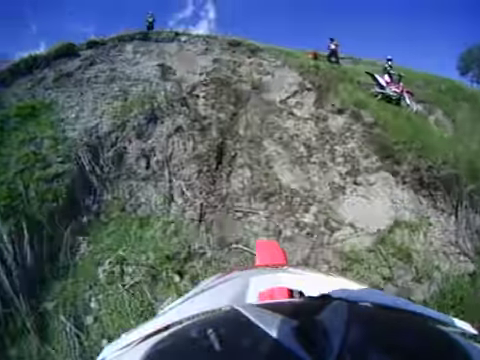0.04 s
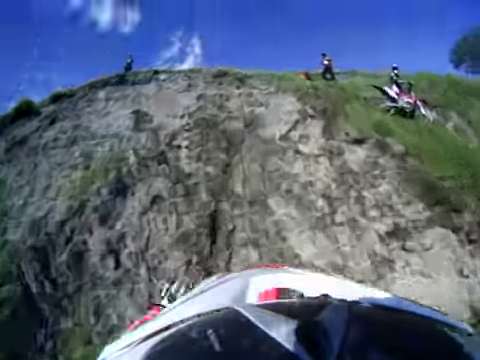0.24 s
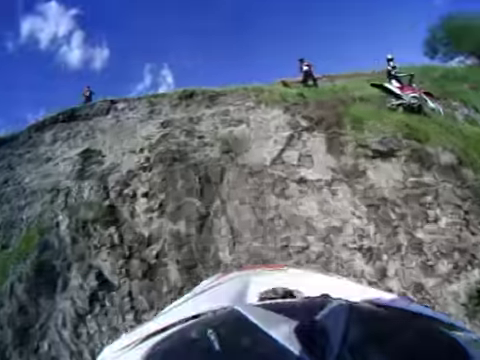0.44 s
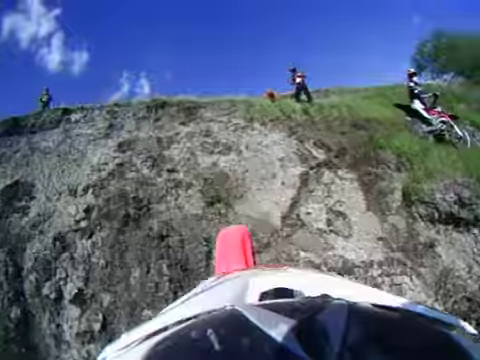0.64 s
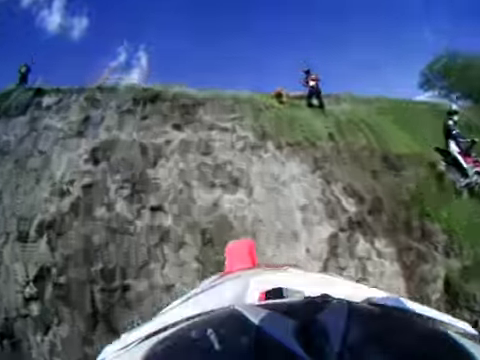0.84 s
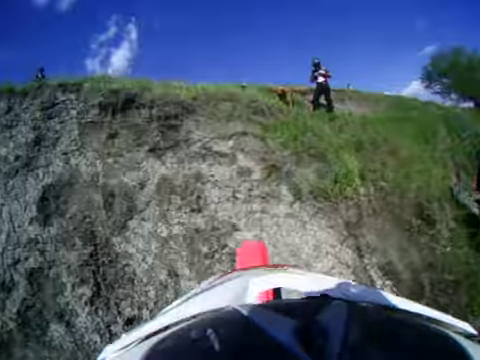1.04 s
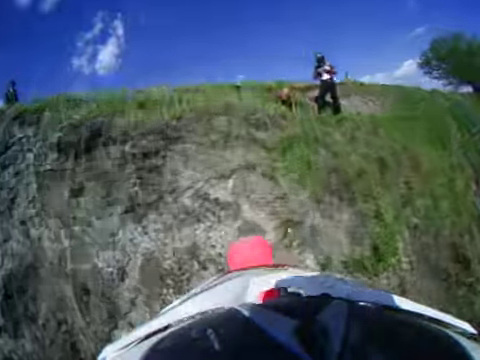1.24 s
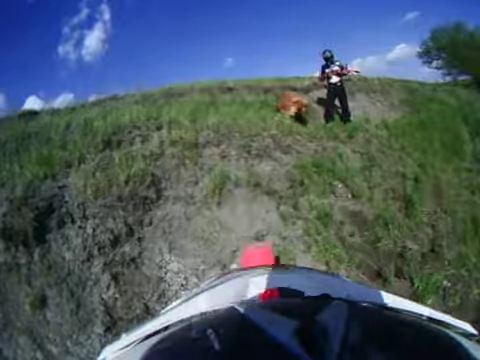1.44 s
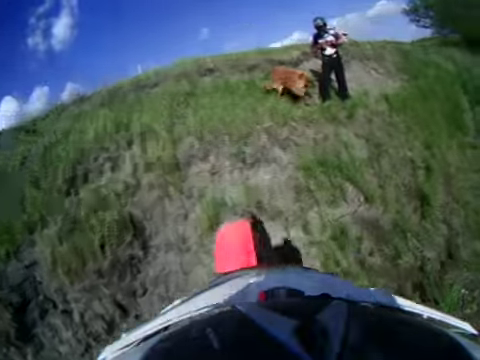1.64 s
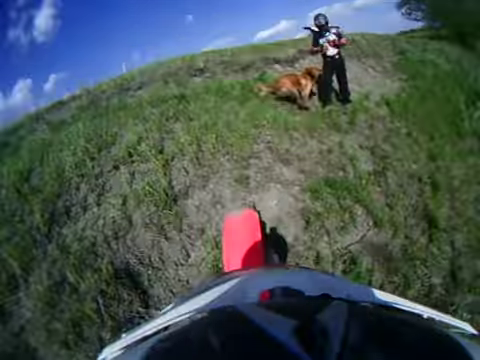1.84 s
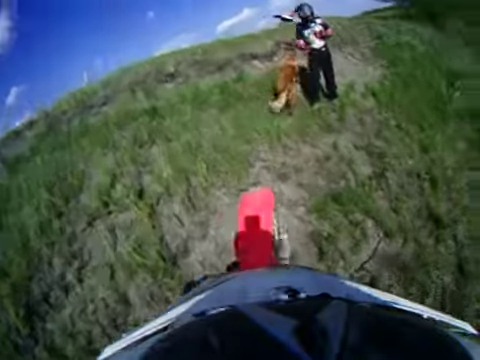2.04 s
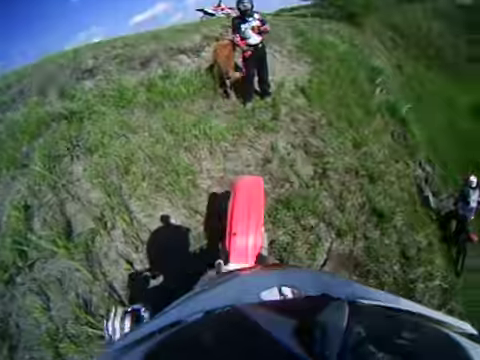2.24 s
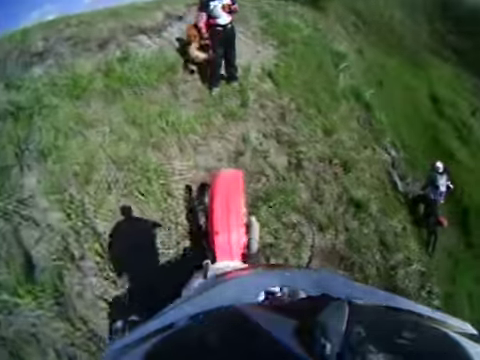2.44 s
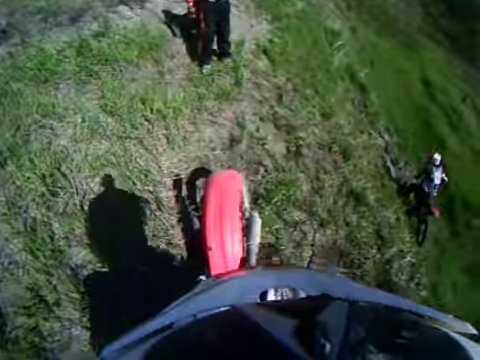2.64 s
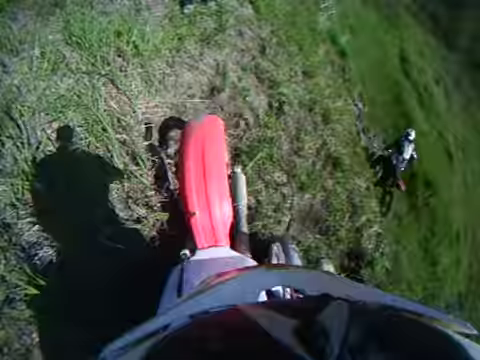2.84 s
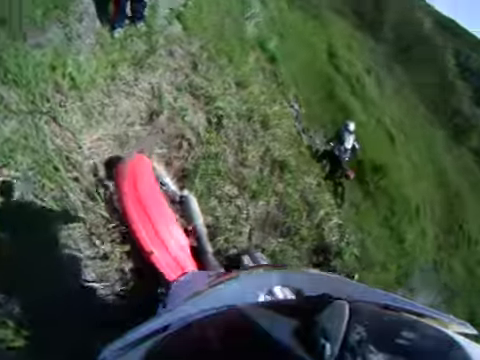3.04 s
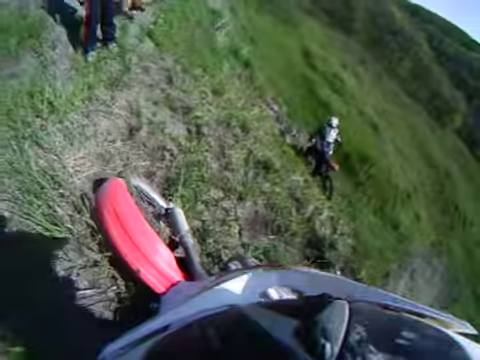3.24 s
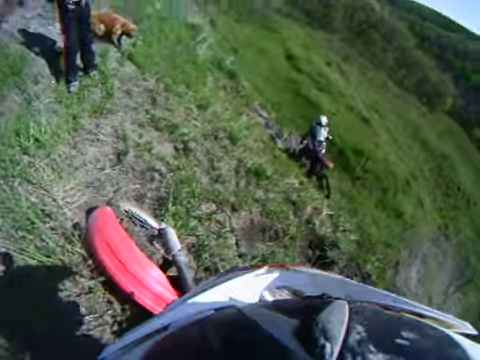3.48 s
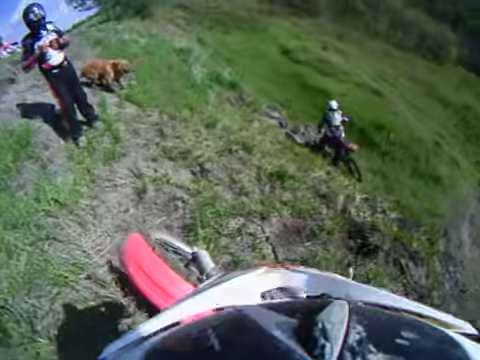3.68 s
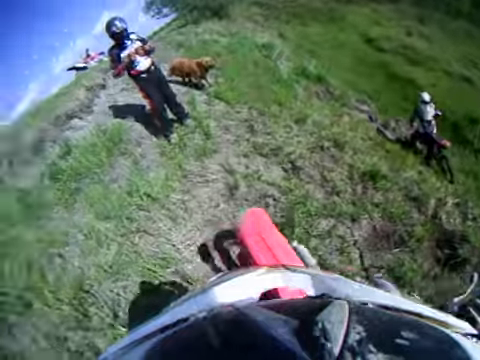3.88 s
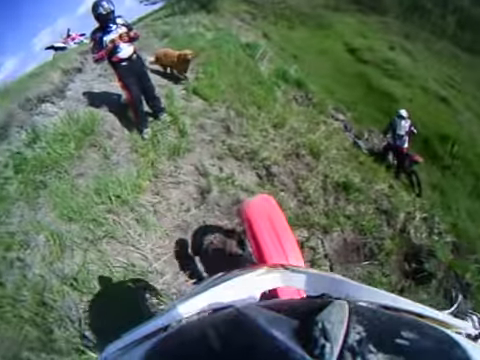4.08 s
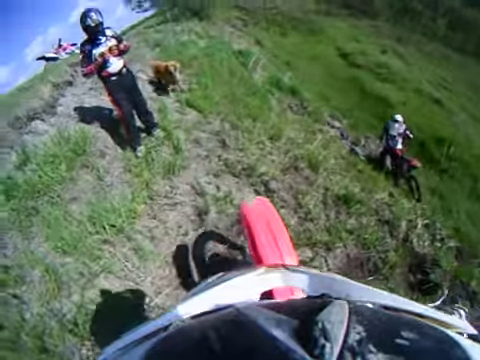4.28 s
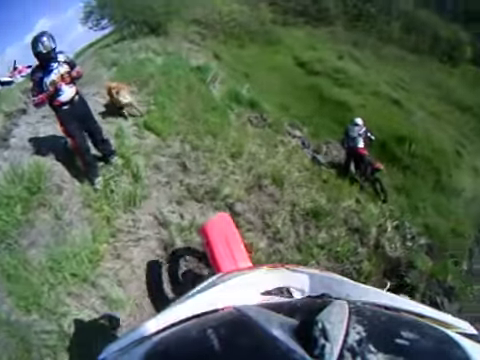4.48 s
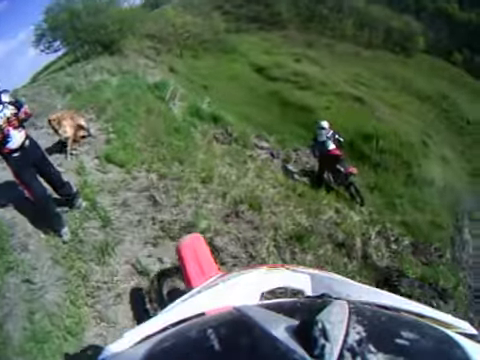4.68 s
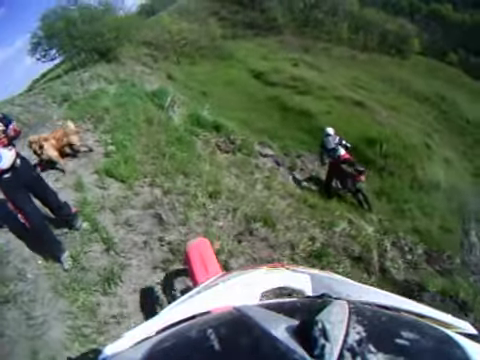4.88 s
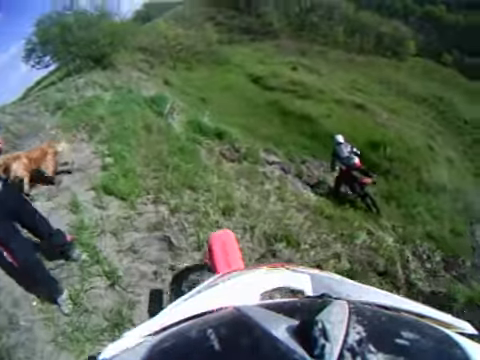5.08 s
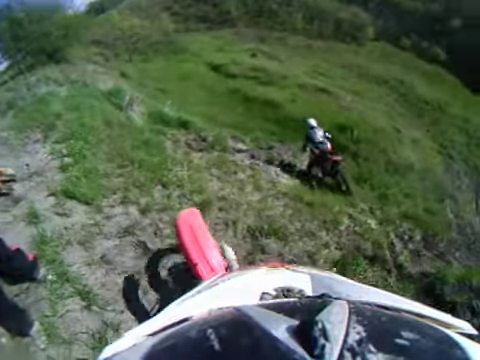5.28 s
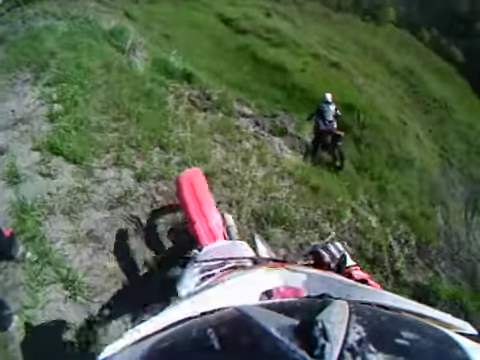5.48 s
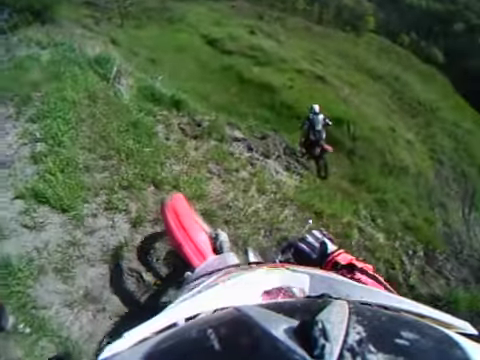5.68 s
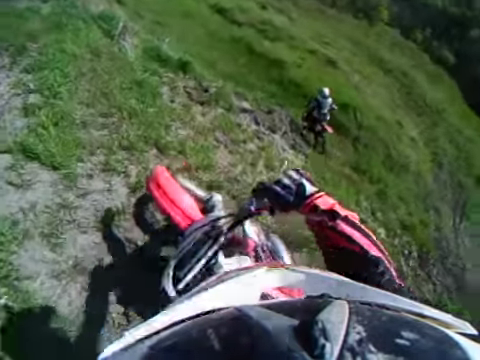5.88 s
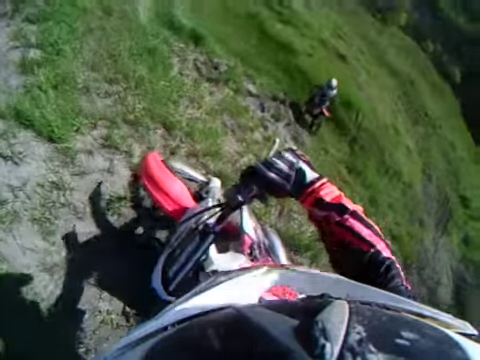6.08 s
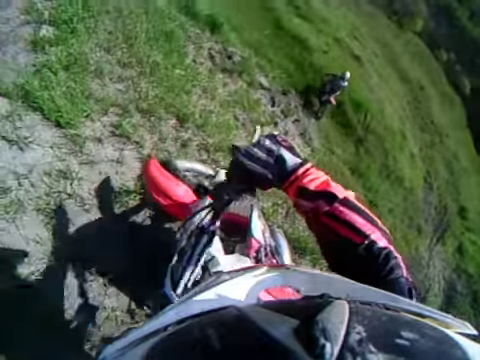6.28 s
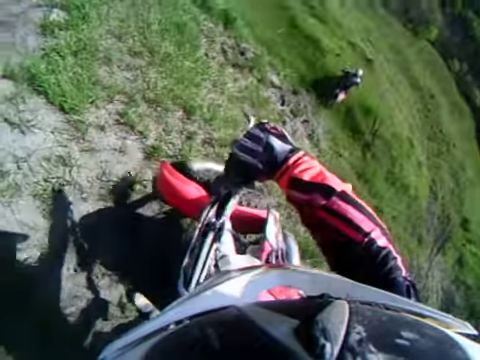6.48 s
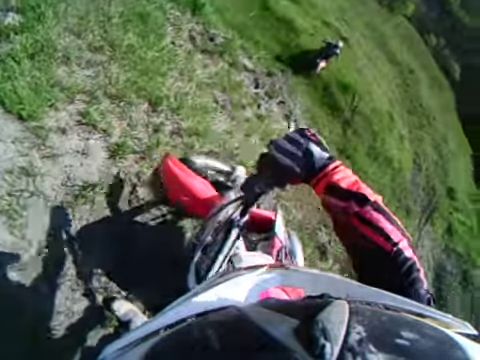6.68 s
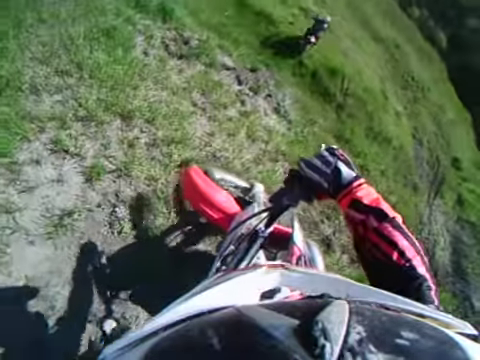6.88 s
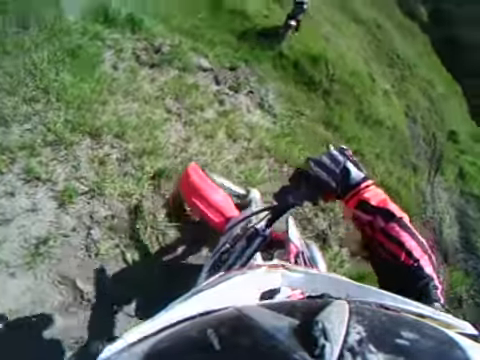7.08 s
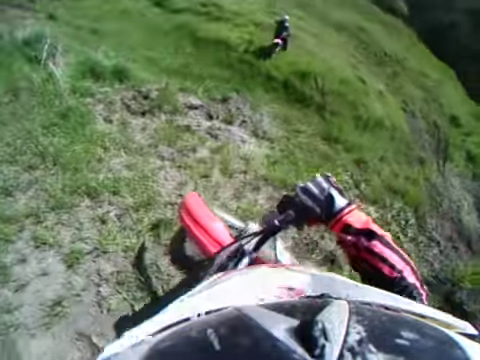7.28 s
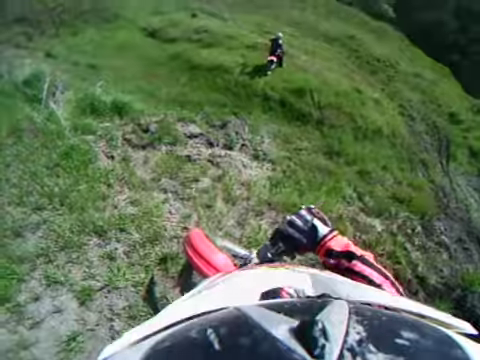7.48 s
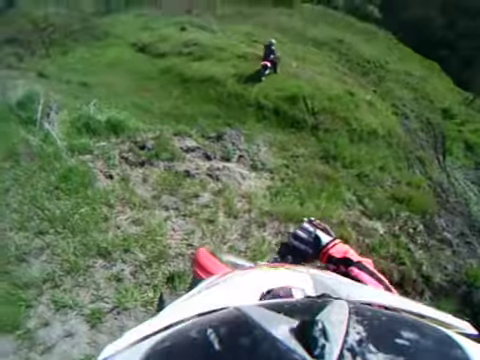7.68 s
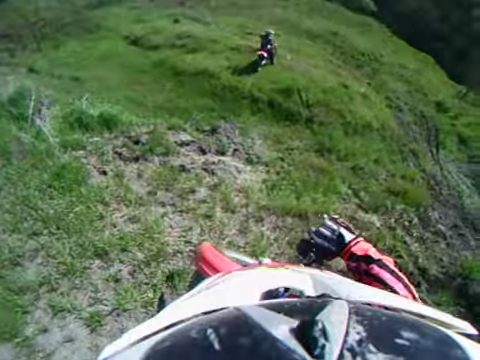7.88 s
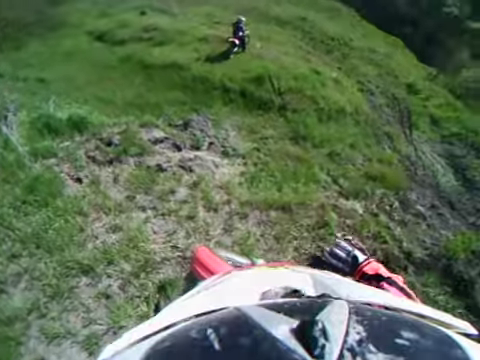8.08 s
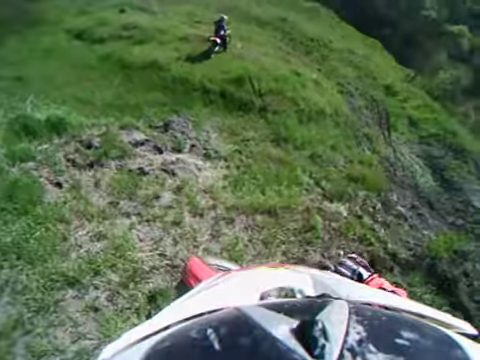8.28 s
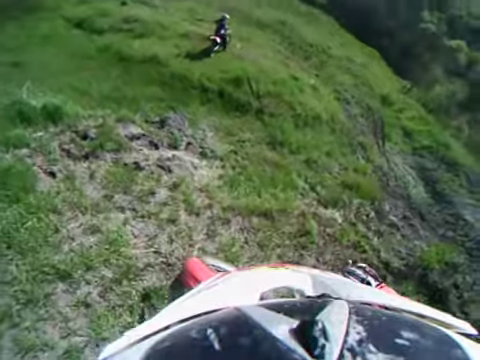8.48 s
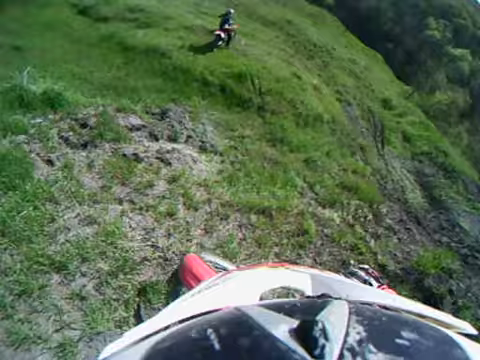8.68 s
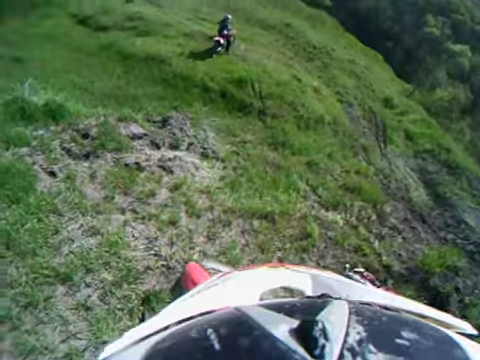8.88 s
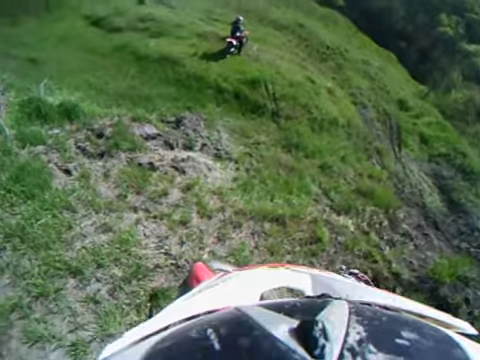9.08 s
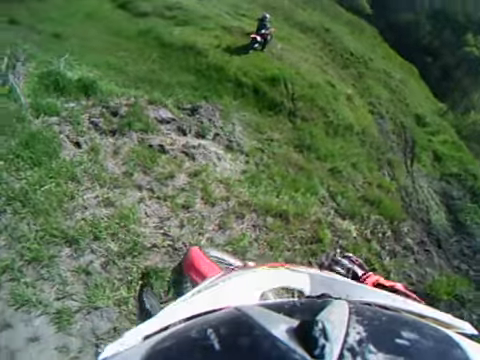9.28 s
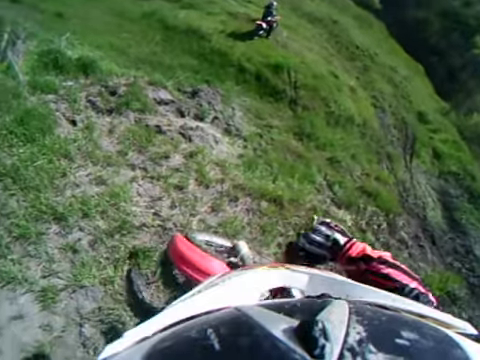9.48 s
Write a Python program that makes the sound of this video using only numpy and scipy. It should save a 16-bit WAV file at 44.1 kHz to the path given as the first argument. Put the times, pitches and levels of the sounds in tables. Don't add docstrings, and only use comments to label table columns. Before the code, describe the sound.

Raspy dirt bike engine very close to a cheap, overloaded helmet microphone on an open hillside. Rapid loud revs rise and fall, sharp knocks break out as the gas is cut, and another roar follows. Then come weaker blips, stuttering pops and a falling pitch, ending in a quiet lumpy idle, with scattered dull putts over a low throb and slight wind rumble.

```python
import sys
import numpy as np
from scipy import signal
from scipy.io import wavfile
from scipy.ndimage import uniform_filter1d

SR = 44100
rng = np.random.default_rng(int(sys.argv[2]) if len(sys.argv) > 2 else 0)


def to_wav(s):
    ch = np.atleast_2d(s).T
    pcm = np.round(np.clip(ch, -1, 1) * 32767)
    wavfile.write(sys.argv[1], SR, pcm.astype(np.int16))


def how_loud(loudness_db):
    steps = np.asarray(loudness_db, float) / 20
    return 10 ** steps


N = 420273
TIME = np.arange(N) / SR
REF_HZ = 92.5
PORT_JITTER_S = .00004
LOADED = .03

# (time [s], level [dB])
WIND_LEVEL = [(0, -27), (.5, -33), (1.0, -22), (1.3, -57), (1.6, -36), (2.0, -41), (3.5, -41.5),
              (4.2, -42.5), (4.5, -31), (5.3, -37), (5.7, -46.5), (6.0, -35.5), (6.4, -42.5), (7.5, -37.5),
              (9.53, -46.5)]
# (time [s], nearness [dB], turn to pipe side [dB], turn to pipe tail [dB])
HEAD_POSE = [(0, 0.5, -7.5, 0), (1.1, 0, -9, 0.5), (1.25, -5.5, -4, 1), (1.45, -0.5, 0, 2),
             (1.7, -4.5, -3, -5.5), (1.801, -3.5, -2.5, 4.5), (2.05, -2, -4.5, -5), (2.6, -1.5, -10.5, 1.5),
             (3.4, -1, -7.5, 5.5), (4.0, 0.5, -15.5, 4.5), (4.3, 0, -11.5, 0.5), (4.7, -5, 0.5, -4),
             (5.0, -5.5, -14, 4), (5.3, 2, -12.5, -3), (5.7, -3.5, -4.5, 3.5), (6.399, 2, -6, -0.5),
             (7.2, -1, 1, 1), (9.53, -1.5, -2.5, 1)]
# (opening [s], speed [Hz], shutting [s], speed [Hz])
THROTTLE_TWISTS = [(-.1, 126, .03, 121.5), (.17, 110.5, .36, 137.5), (.515, 113.5, .57, 118.5),
                   (.65, 113, .78, 124.5), (.79, 124.5, .86, 126), (.945, 116, .99, 130),
                   (1.07, 126, 1.15, 136.5), (1.155, 136.5, 1.215, 140), (1.35, 112, 1.36, 111.5),
                   (1.44, 102.5, 1.52, 114.5), (1.585, 116, 1.72, 148.5), (2.03, 89, 2.31, 118),
                   (2.52, 101, 2.63, 109.5), (3.075, 83.8, 3.13, 91.5), (3.21, 88.5, 3.255, 97),
                   (3.26, 97, 3.385, 104), (3.85, 83, 3.93, 92.5), (4.0, 89, 4.08, 89),
                   (4.32, 67.5, 4.33, 67.5), (4.4, 63.5, 4.45, 64), (4.53, 61.5, 4.93, 96.5),
                   (7.7, 40, 8.1, 41.6), (8.18, 41, 8.42, 47), (8.52, 46, 9.2, 47.4), (9.53, 43.4, 9.7, 45)]
# (frequency [Hz], width [Hz], level [dB])
CASE_MODES = [(1040, 190, -1), (1442, 130, 1.5), (1710, 1100, -6.5), (2370, 450, -2), (2564, 260, 0.5),
              (2924, 930, -5.5)]
# (frequency [Hz], width [Hz], level [dB])
PIPE_MODES = [(368, 21, -2.5), (516.2, 22, 7), (594.4, 78, 2), (669.3, 67, -5), (739, 38, -6.5),
              (802, 35, -6), (883, 49, -22.5)]
# (frequency [Hz], width [Hz], level [dB])
LONG_PIPE_MODES = [(93, 23, -7.5), (162.8, 26, -3), (218.3, 45, 3.5), (284.6, 53, 4)]
# (delay [s], share [1])
PIPE_RETURNS = [(.0037, -0.65), (.0071, 0.82), (0.0115, 0.0039), (0.0165, -0.39)]
# (frequency [Hz], width [Hz], level [dB])
COOL_PIPE_MODES = [(360, 29, -8.5), (516, 15, 3.5), (781, 15, -2.5), (910, 60, -27.5)]
# (delay [s], share [1])
COOL_PIPE_RETURNS = [(.0037, .6), (.0046, -1.5), (.0059, .6), (.0131, -.3), (.0141, .3)]
# (time [s], crack [dB], thump [dB])
IDLE_FIRINGS = [(7.1872, -30, -13.5), (7.4673, -31.5, -11), (7.6382, -31.5, -12), (7.7617, -34, -14.5),
                (7.8114, -22.5, -8.5), (7.9073, -35, -14.5), (8.003, -21, -6.5), (8.1702, -22, -8.5),
                (8.3336, -23, -10), (8.3768, -18.5, -7), (8.5483, -33, -15.5), (8.5907, -39, -15.5),
                (8.634, -21.5, -10), (8.998, -24, -11), (9.1246, -19, -8), (9.3136, -33, -15),
                (9.381, -22, -7.5)]
# (time [s], crack [dB], thump [dB])
HALF_BURNT = [(7.712, -51, -17.5), (8.3095, -41, -24), (8.452, -50, -33), (8.9332, -39, -19),
              (9.0598, -38, -19), (9.241, -52, -31), (9.27, -38, -17)]
# (frequency [Hz], width [Hz], level [dB])
THUMP_MODES = [(140, 91, -14), (310, 67, 1), (356.4, 370, 1.5), (514, 32, 2), (593, 76, 8),
               (770, 27, -12.5), (870, 60, -25)]
# (frequency [Hz], width [Hz], level [dB])
CRACK_MODES = [(1407, 75, 1.5), (2130, 110, 0.5), (2563, 310, 3), (2900, 1500, -11.5)]
# (time [s], crack [dB], thump [dB])
STRAY_POPS = [(1.939, -15, -2.5), (1.9832, -25, -2.5), (2.0459, -22, -2), (2.2355, -17, -21),
              (2.2775, -12.5, -10), (2.3365, -18, -18), (3.2287, -12.5, -4), (3.311, -14, -5),
              (3.3592, -18, -2.5), (3.7811, -21, -19), (3.8252, -21, -12), (3.8473, -18.5, -39),
              (3.984, -15.5, -24), (4.038, -9.5, -5), (4.1936, -11.5, -4), (4.4541, -32, -6),
              (4.8152, -21, -3), (5.008, -21.5, -34), (5.054, -25, -14.5), (5.946, -40, -13.5),
              (6.75, -55, -18)]
# (time [s], crack [dB], thump [dB], second firing [dB])
DOUBLE_POPS = [(2.0, -25, -8, 2), (2.0878, -16, -1, -5), (2.1255, -22, -13, 5), (2.1457, -22.5, -8, 3),
               (2.1653, -22, -4, -6.5), (2.197, -21, -9, 5), (2.5773, -25.5, -23, 9.5),
               (3.0938, -17, -5.5, 3.5), (3.8826, -13, -7, 2.5), (4.1101, -12, -10, -0.5),
               (4.2699, -22.5, -9.5, 0), (4.3145, -26, -20, 10), (4.391, -16.5, -4, -2.5),
               (4.4728, -14, -3, -4), (4.5366, -12.5, -1, -7), (4.599, -12.5, -1, -12),
               (4.6555, -16, 1, -6), (4.7123, -12.5, -0.5, -8), (4.7509, -11.5, 0.5, -10),
               (4.7892, -17.5, -8, 4), (4.848, -13.5, -5.5, -2), (4.893, -11, -7, -3.5)]
# (time [s], level [dB])
HARD_KICKS = [
    (1.21, -3),
    (1.2319, -5.5),
    (1.2404, -5),
    (1.2537, -7),
    (1.2697, 4.5),
    (1.2921, -1),
    (1.4648, -12.5),
    (1.493, -3),
]
# (time [s], level [dB])
BLAST_LEVEL = [
    [(0, -2.5), (.22, -3.5), (.3, -10), (.45, -9), (.51, -9.5), (.56, -6), (.7, 0), (.8, -5), (1.135, -3.5)],
    [(1.2, -14), (1.29, -18)],
    [(1.46, -16), (1.52, -5.5), (1.61, -1.5), (1.725, -6)],
    [(2.18, -36.5), (2.29, -18)],
]
# (frequency [Hz], width [Hz], level [dB])
BLAST_MODES = [(125.6, 11, -14.5), (257.1, 70, 5), (369, 94, -7), (482, 51, -10), (563, 110, -7.5),
               (846, 140, -3), (1060, 480, -9)]


def ring(x, modes, flip=-1, drift_db=0.):
    total = 0
    for k, (hz, width_hz, db) in enumerate(modes):
        gain = flip ** k * how_loud(db + drift_db * walk(3))
        total = total + gain * signal.lfilter(*signal.iirpeak(hz, hz / width_hz, fs=SR), x)
    return total


def unit(x):
    return x / np.sqrt(np.mean(x ** 2))


def even(x):
    power = uniform_filter1d(uniform_filter1d(x ** 2, size=12000), size=12000)
    return x / np.sqrt(power + 1e-12)


def clicks(times_s, sizes):
    place = np.clip(times_s * SR, 0, N - 2)
    at = place.astype(int)
    first = np.bincount(at, sizes * (1 - place + at), N)
    return first + np.bincount(at + 1, sizes * (place - at), N)


def walk(rate_hz):
    k = int(SR / rate_hz)
    steps = np.repeat(rng.standard_normal(N // k + 1), k)
    return 1.4 * uniform_filter1d(uniform_filter1d(steps, k), k)[:N]


def steep(x, hz, kind):
    return signal.sosfilt(signal.butter(4, hz, kind, fs=SR, output="sos"), x)


def late(x, delay_s):
    lag = int(delay_s * SR)
    return np.concatenate([np.zeros(lag), x[:-lag]])


def decaying_noise(x, decay_s):
    return signal.lfilter([1], [1, -np.exp(-1 / (decay_s * SR))], x) * rng.standard_normal(N)


def turn_clicks(turns, offset, scatter_db, jitter_s):
    chance = rng.standard_normal((1200, 2))
    count = np.arange(1, int(turns[-1]))
    times_s = np.interp(count + offset, turns, TIME) + jitter_s * chance[count, 0]
    return clicks(times_s, how_loud(scatter_db * chance[count, 1]))


def wind():
    rumble = steep(rng.standard_normal(N), 40, "low")
    rumble = rumble + how_loud(-5.5) * steep(rng.standard_normal(N), 160, "low")
    return unit(rumble) * how_loud(np.interp(TIME, *np.transpose(WIND_LEVEL)) + 0.83 * walk(4.2) + 1.0)


def crank_hz():
    stall_hz, flywheel_s = 34, .03
    s, hz = np.reshape(THROTTLE_TWISTS, (-1, 2)).T
    speed_hz = stall_hz + np.exp(np.interp(TIME, s, np.log(hz - stall_hz)))
    return uniform_filter1d(speed_hz, int(flywheel_s * SR), mode="nearest")


def in_step(turns):
    s = np.transpose(IDLE_FIRINGS)[0]
    at = np.interp(s, TIME, turns)
    whole = np.round(at[0]) + np.concatenate([[0], np.cumsum(np.round(np.diff(at)))])
    return turns + np.interp(TIME, s, whole - at)


def throttle():
    edge_s = .012
    gain = sum(how_loud(np.interp(TIME, *np.transpose(part), left=-99, right=-99)) for part in BLAST_LEVEL)
    return uniform_filter1d(gain, int(edge_s * SR), mode="nearest")


def once_a_turn(turns, octaves, load, near_db):
    climbing = np.clip(uniform_filter1d(np.gradient(octaves) * SR, size=3000), 0, 1) * (load < LOADED)
    climbing = climbing - 1.1 * uniform_filter1d(1. * (load > LOADED), size=2000)
    level_db = -33.5 + 6 * octaves + 0.29 * near_db - 9.5 * climbing + 0.21 * walk(29)
    return np.sqrt(2) * np.sin(2 * np.pi * turns) * how_loud(level_db)


def rattle(turns, hz):
    gate = 0.58 + np.exp(-(turns % 1) / .25)
    slap = turn_clicks(turns, offset=0.11, scatter_db=-0.5, jitter_s=PORT_JITTER_S / 2)
    slap = how_loud(-6) * np.sqrt(SR / hz) * (hz / 95) ** 2 * slap
    hiss = gate * how_loud(1.1 * walk(30)) * rng.standard_normal(N)
    return unit(ring(slap + hiss, CASE_MODES))


def pumping(turns, hz, side_db, tail_db):
    transfer, trip_s, trip_share = 0.22, .0092, .55
    ports = turn_clicks(turns, 0, scatter_db=1.7, jitter_s=PORT_JITTER_S)
    ports = ports - transfer * turn_clicks(turns, offset=.49, scatter_db=3.9, jitter_s=PORT_JITTER_S)
    ports = ports * np.sqrt(SR / hz / (1 + transfer ** 2))
    ports = ports + sum(share * late(ports, s) for s, share in PIPE_RETURNS)
    trips = late(ports + trip_share * late(ports, trip_s), trip_s)
    ports = ports + trip_share * np.clip(2 - hz / 45, 0, 1) * trips
    gas = ports + how_loud(-14 + 2.5 * walk(24)) * rng.standard_normal(N)
    short = ring(gas, PIPE_MODES[:2], drift_db=2.43)
    short = short + how_loud(tail_db) * ring(late(gas, .003), PIPE_MODES[2:], drift_db=2.88)
    short = steep(short, 1000, "low")
    long = steep(steep(ring(gas, LONG_PIPE_MODES, drift_db=2.75), 135, "high"), 460, "low")
    return even(short) + how_loud(side_db) * late(even(long), .0055)


def idle_firing(thumps):
    puff = thumps - 0.27 * steep(thumps, 120, "low")
    waves = puff + sum(share * late(puff, s) for s, share in COOL_PIPE_RETURNS)
    waves = waves - how_loud(11) * ring(late(puff, 0.00448), COOL_PIPE_MODES, flip=0.8)
    return how_loud(27.5) * steep(waves, 654, "low")


def strays(hz):
    s, crack_db, thump_db, second_db = np.transpose(DOUBLE_POPS)
    seconds = [s + 1 / np.interp(s, TIME, hz), crack_db + second_db, thump_db + second_db]
    return np.hstack([np.transpose(STRAY_POPS), [s, crack_db, thump_db], seconds])


def firing(thumps, cracks):
    tail = decaying_noise(thumps, 0.036)
    thumps = thumps - 0.87 * late(thumps, 0.0045) + how_loud(-31.0) * tail
    puff = decaying_noise(cracks, 0.019)
    body = steep(ring(thumps, THUMP_MODES, flip=0.78), 787, "low")
    crack = ring(cracks + how_loud(-27) * puff, CRACK_MODES + CASE_MODES[:1])
    return 0.42 * np.tanh(how_loud(29) * body / 0.46) + how_loud(22.5) * crack


def hard_kicks():
    s, db = np.transpose(HARD_KICKS)
    return how_loud(28.0) * ring(clicks(s, how_loud(db)), THUMP_MODES, flip=0.99)


def loaded(turns, load):
    return load * turn_clicks(turns, offset=.04, scatter_db=1.0, jitter_s=PORT_JITTER_S)


def blast(run):
    return how_loud(39.5) * steep(ring(run, BLAST_MODES, drift_db=4.0), 1500, "low")


def scene():
    hz, load = crank_hz(), throttle()
    turns = in_step(np.cumsum(hz) / SR)
    octaves = np.log2(hz / REF_HZ)
    s, *columns = np.transpose(HEAD_POSE)
    near_db, side_db, tail_db = (np.interp(TIME, s, c) for c in columns)
    throb = once_a_turn(turns, octaves, load, near_db)
    run = loaded(turns, load)

    pump_db = -17.5 + 12.5 * octaves + near_db
    burning_db = 9 * (uniform_filter1d(run, size=1000) > 1e-5)
    side_db = side_db + 6 * (load > LOADED) - uniform_filter1d(1. * burning_db, size=800)
    pumped = how_loud(pump_db) * pumping(turns, hz, side_db, tail_db)
    hiss = how_loud(pump_db - 22) + how_loud(-17.5) * load
    shaken = hiss * rattle(turns, hz)

    stray_s, crack_db, thump_db = strays(hz)
    idle_s, idle_crack_db, idle_thump_db = np.transpose(IDLE_FIRINGS + HALF_BURNT)
    cracks = clicks(stray_s, how_loud(crack_db)) + clicks(idle_s, how_loud(idle_crack_db)) + how_loud(-15.5) * run
    fired = firing(clicks(stray_s, how_loud(thump_db)), cracks)
    fired = fired + idle_firing(clicks(idle_s, how_loud(idle_thump_db)))
    return (wind() + throb + shaken + pumped + fired + hard_kicks() + blast(run))[None]


def low_pass(x):
    return signal.sosfilt(signal.butter(12, 15800, fs=SR, output="sos"), x)


def record(dry):
    up, down = 441, 80
    full, drop_share = .66, .14
    slow = signal.resample_poly(dry, down, up, axis=1)
    chance = rng.random((2,) + slow.shape)
    over = np.abs(slow) > full + .1
    entering = over & ~np.roll(over, 1, axis=1)
    dropped = over & (chance[0] < drop_share + .33 * entering)
    held = np.clip(slow, -full, full)
    held = held - dropped * np.sign(slow) * (0.18 + 0.58 * chance[1])
    smooth = signal.firwin(32 * up + 1, 1 / up, window=("kaiser", 9))
    fast = signal.resample_poly(held, up, down, axis=1, window=smooth)[:, :N]
    fast = np.pad(fast, ((0, 0), (0, N - fast.shape[1])), mode="edge")
    mix = np.clip(fast + 0.0056, -.7, .71)
    return low_pass(mix)


dry = scene()
out = record(dry)
to_wav(out)
```